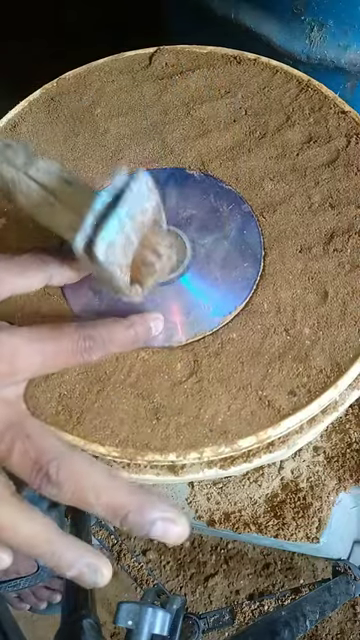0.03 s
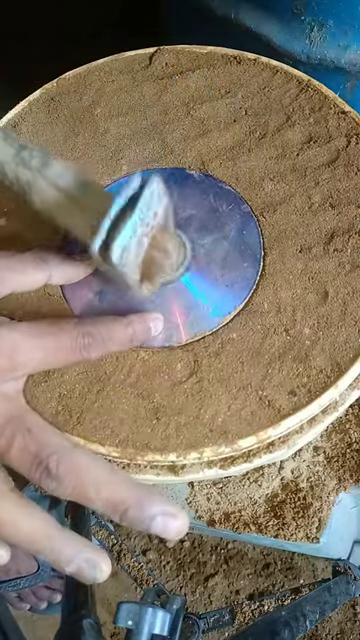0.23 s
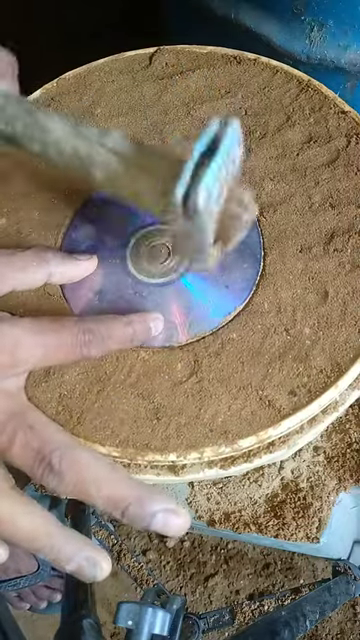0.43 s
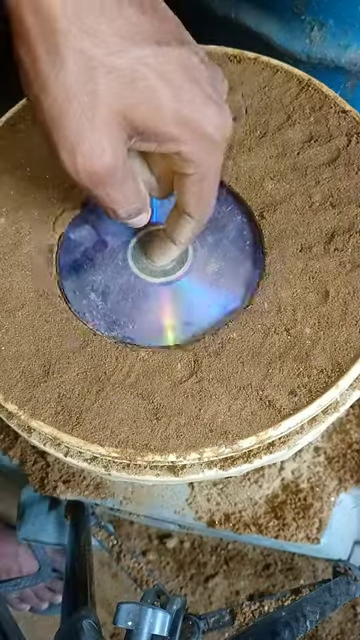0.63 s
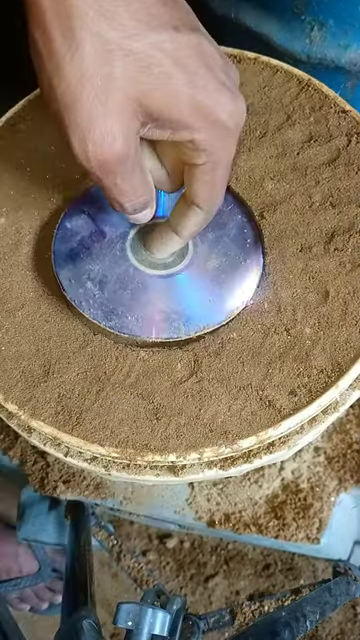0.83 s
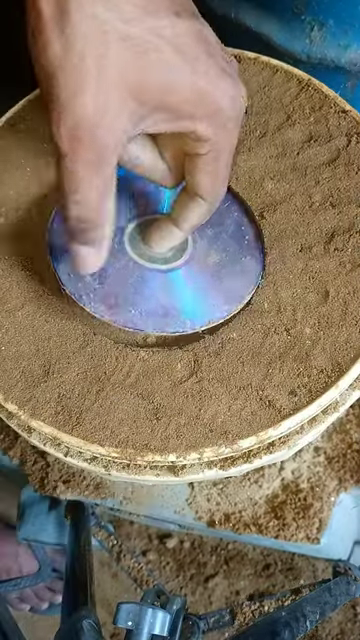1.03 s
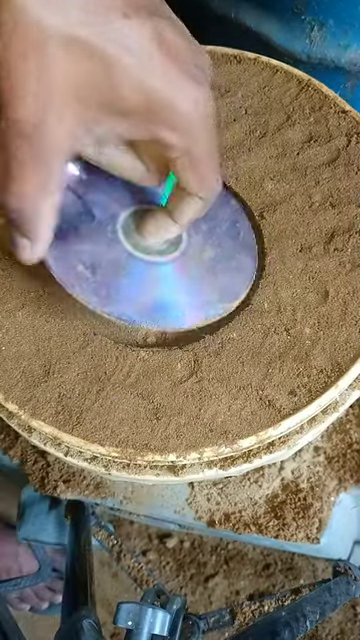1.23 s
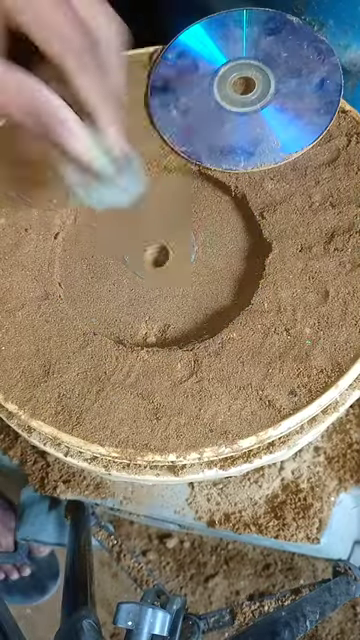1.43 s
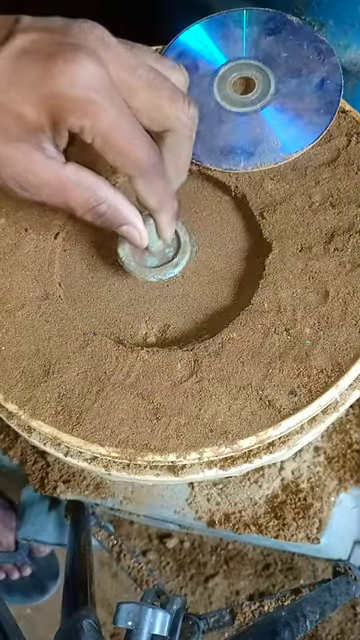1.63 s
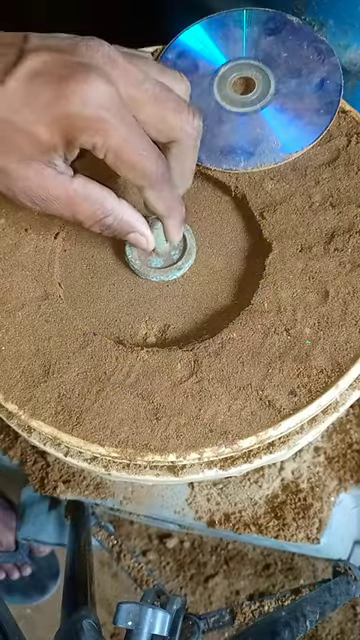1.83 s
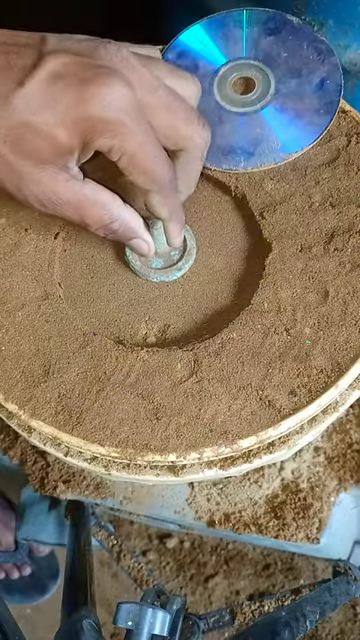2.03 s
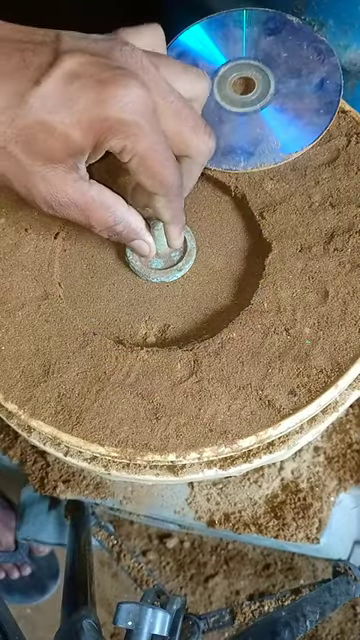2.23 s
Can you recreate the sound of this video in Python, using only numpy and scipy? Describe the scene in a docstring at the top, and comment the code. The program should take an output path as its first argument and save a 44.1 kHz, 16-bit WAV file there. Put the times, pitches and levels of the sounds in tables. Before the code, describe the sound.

Six quick, dry taps on a disc lying in sand, followed by faint finger rubs.

```python
"""Six dry taps and a small bounce: a hand tool beds a plastic disc into packed moulding sand, then is put aside.
Each tap is a click that the sand stops within 2 ms, over the thud of the moulding box and a short room tail.
Behind it the workshop hisses, a machine whines faintly and a low hum swells and fades.
Fingers press a small metal piece into the sand with soft bumps and rubs."""
import sys
import numpy as np
from scipy import signal
from scipy.fft import rfft, irfft
from scipy.io import wavfile

SR = 44100
rng = np.random.default_rng(int(sys.argv[2]) if len(sys.argv) > 2 else 0)


def log_audio(samples):
    """Write samples as a 16-bit WAV file to the path given in sys.argv[1]."""
    # one column per channel
    frames = np.atleast_2d(samples).T
    # limit to full scale, then quantise
    limited = np.clip(frames, -1, 1)
    pcm = np.round(limited * 32767).astype(np.int16)
    wavfile.write(sys.argv[1], SR, pcm)


N = 101429
TAP_SAMPLES = 16384


def amp(db):
    """dB to gain."""
    return 10 ** (np.asarray(db) / 20)


def unit_rms(x):
    """Scale to rms 1."""
    return x / np.sqrt(np.mean(x ** 2) + 1e-20)


def at_hz(table, hz):
    """Interpolate a table over log frequency."""
    table_hz, value = np.transpose(table)
    return np.interp(np.log(hz + 1), np.log(table_hz + 1), value)


def curve(table, column=1):
    """One column of a time table, per sample."""
    table = np.array(table)
    return np.interp(np.arange(N) / SR, table[:, 0], table[:, column])


def add(mix, start_s, sound):
    """Mix a sound in at start_s."""
    part = mix[max(round(start_s * SR), 0):][:len(sound)]
    part += sound[:len(part)]


def minimum_phase(db):
    """Spectrum of the quickest pulse with these levels."""
    log_gain = np.log(amp(np.r_[db, db[-2:0:-1]]))
    return np.exp(np.conj(signal.hilbert(log_gain)))[:len(db)]


def shaped_noise(spectrum):
    """Steady noise of a given spectral shape, rms 1."""
    gain = amp(at_hz(spectrum, np.fft.rfftfreq(N, 1 / SR)))
    return unit_rms(irfft(rfft(rng.standard_normal(N)) * gain, N))


def band_noise(centre_hz, width_hz):
    """Noise in one Gaussian band, rms 1."""
    gain = np.exp(-((np.fft.rfftfreq(N, 1 / SR) - centre_hz) / width_hz) ** 2)
    return unit_rms(irfft(rfft(rng.standard_normal(N)) * gain, N))


def workshop_hiss():
    """One hiss gives way to another; the level dips briefly between them."""
    # Hiss spectra: f/Hz, relative density/dB
    early_spectrum = [(20, -43), (60, -29), (105, -23.5), (135, -6), (200, -6), (260, -8.5), (400, -15),
                      (600, -17.5), (1100, -19.5), (1900, -23.5), (3800, -24), (4550, -29), (5200, -23.5),
                      (5700, -26.5), (6100, -28.5), (6500, -20.5), (6950, -24), (7350, -32), (7750, -22.5),
                      (8200, -24.5), (8500, -30.5), (8900, -27), (9500, -38), (10200, -40), (11200, -47.5),
                      (13500, -49), (15000, -46), (16000, -52.5)]
    late_spectrum = [(20, -36.5), (60, -21), (95, -7.5), (118, 2), (220, 1.5), (320, -6), (600, -9.5),
                     (1200, -12), (1600, -15), (2600, -13.5), (3600, -16), (5200, -16), (5650, -10.5),
                     (6350, -20), (6950, -13.5), (7300, -18.5), (7600, -17.5), (8100, -31), (8500, -27.5),
                     (9800, -40.5), (12000, -37), (12600, -35), (14000, -41), (16000, -44)]
    # Hiss envelopes: t/s, level/dB
    early_levels = [(0, -66), (.66, -66.5), (.75, -70.5), (.87, -66.5), (1.0, -67), (1.19, -62.5),
                    (1.35, -66), (1.48, -67.5), (1.53, -79.5), (1.65, -102.5)]
    late_levels = [(1.5, -91.5), (1.58, -75), (1.66, -69), (1.97, -69), (2.08, -67), (2.3, -68.5)]
    early = shaped_noise(early_spectrum) * amp(curve(early_levels))
    late = shaped_noise(late_spectrum) * amp(curve(late_levels))
    return early + late


def machine_whine():
    """Faint narrow-band whine of a machine."""
    # Envelope: t/s, level/dB
    levels = [(0, -83), (.9, -84.5), (1.3, -79.5), (1.46, -76.5), (1.53, -105), (2.3, -90)]
    return band_noise(centre_hz=1196, width_hz=15) * amp(curve(levels))


def hum():
    """A low tone swells, sags in pitch and fades."""
    # Pitch and envelope: t/s, f/Hz, level/dB
    track = [(0, 156, -84), (.8, 157.3, -73.5), (1.0, 159.6, -65.5), (1.11, 156.4, -57), (1.17, 155.5, -52),
             (1.25, 154.5, -52), (1.3, 151.6, -58), (1.35, 149, -75), (1.45, 148.6, -70.5),
             (1.56, 145.6, -83)]
    tone = np.sqrt(2) * np.sin(2 * np.pi * np.cumsum(curve(track)) / SR)
    return tone * amp(curve(track, column=2))


def handling():
    """Soft bumps, rubs and squeaks: each a short swell of noise in one resonance."""
    # Touches: centre t/s, sigma/s, f/Hz, width/Hz, level/dB
    touches = [(.005, 0.0042, 280, 130, -51.5), (.005, 0.011, 1500, 2540, -63.5),
               (0.87, 0.011, 200, 69.4, -65), (0.96, 0.014, 209, 70, -65.5), (1.904, 0.005, 398, 100, -65),
               (2.1, 0.025, 1900, 600, -74.5), (2.171, .02, 1170, 40.3, -73.5)]
    t = np.arange(N) / SR
    return sum(amp(db) * np.exp(-.5 * ((t - centre_s) / sigma_s) ** 2) * band_noise(hz, width_hz)
               for centre_s, sigma_s, hz, width_hz, db in touches)


def room_tail(t, onset_s=0.0018):
    """Spectrum of dense room reflections, each band dying at its own rate."""
    # Tail colour: f/Hz, level/dB
    colour = [(60, -8.5), (150, -2), (400, -0.5), (700, -1.5), (1200, -6), (2700, -7.5), (4500, -17),
              (7000, -18.5), (14000, -5.5)]
    # Tail decay: f/Hz, t60/s
    decay_times = [(150, 0.75), (400, 0.11), (1000, 0.11), (3000, 0.11), (7000, 0.17), (14000, .1)]
    reflections = rng.choice([-1., 1.], len(t)) * (rng.random(len(t)) < .2)
    hz, frame_s, bands = signal.stft(unit_rms(reflections), SR, nperseg=256)
    decay_per_s = np.log(1000) / at_hz(decay_times, hz)[:, None]
    envelope = np.exp(-decay_per_s * frame_s) * np.sqrt(2 * decay_per_s / SR)  # unit energy
    tail = signal.istft(bands * amp(at_hz(colour, hz)[:, None]) * envelope, SR)[1][:len(t)]
    return rfft(tail * np.minimum(t / onset_s, 1) ** 2)


def delay(hz, ms):
    """Spectrum of a pure delay."""
    return np.exp(-2j * np.pi * hz * ms / 1000)


def first_echoes(hz):
    """Spectrum of the reflections from hand and bench."""
    # Reflections: delay/ms, gain
    echoes = [(5.9, 0.041), (7.6, .06)]
    return sum(gain * delay(hz, ms) for ms, gain in echoes)


def box_thud(t, tilt_db_per_oct, pivot_hz=402, rise_s=.002):
    """The sand-filled box rings in damped modes."""
    # Box modes: f/Hz, level/dB, t60/s
    modes = [(159.4, -56, .28), (216.5, -48.5, 0.098), (253, -48.5, .2), (304.5, -51, 0.16),
             (403, -43.5, 0.11), (451, -52, 0.11), (483.2, -48, 0.043), (502.7, -47.5, 0.19),
             (711, -50, 0.12), (918, -53.5, 0.14), (1110, -54.5, 0.094), (1255, -51, 0.11),
             (1633, -55, 0.13)]
    ring = sum(amp(db + tilt_db_per_oct * np.log2(hz / pivot_hz)) * np.exp(-np.log(1000) * t / t60_s)
               * np.sin(2 * np.pi * (hz * t + rng.random())) for hz, db, t60_s in modes)
    return ring * (1 - np.exp(-t / rise_s))


def sand_crunch(t, relative_db=-10.5, peak_s=0.0011):
    """Spectrum of grains shifting under the disc."""
    grains = rng.standard_normal(len(t)) * t * np.exp(-t / peak_s)
    return amp(relative_db) * rfft(grains) / np.linalg.norm(grains)


def disc_click(hz, db, tilt_db_per_oct, edge_hz, edge_drop_db=-10):
    """Spectrum of the tool striking the disc; a softer contact has a lower treble edge."""
    # Base click spectrum: f/Hz, level/dB
    spectrum = [(30, -29), (90, -30.5), (160, -12.5), (300, -9.5), (500, -2.5), (680, -6.5), (1000, -0.5),
                (2000, -2), (3000, 2), (3600, 2), (4300, 5.5), (5000, 3), (5700, 1.5), (6800, -2),
                (7400, -11.5), (8100, -7), (9000, -17.5), (10000, -17), (12000, -26), (15000, -30.5),
                (16000, -41)]
    octaves = np.log2(np.maximum(hz, 300) / 2000)
    above_edge = 1 - 1 / (1 + (hz / edge_hz) ** 10)
    return minimum_phase(db + at_hz(spectrum, hz) + tilt_db_per_oct * octaves + edge_drop_db * above_edge)


def tap(click_db, tilt_db_per_oct, edge_hz, chatter_ms, chatter_gain, stop_ms, stop_gain, stop_edge_hz,
        thud_db, thud_tilt_db_per_oct, room_db):
    """The disc is kicked, chatters and is stopped by the sand; the box thuds, the room answers."""
    hz, t = np.fft.rfftfreq(TAP_SAMPLES, 1 / SR), np.arange(TAP_SAMPLES) / SR
    click = disc_click(hz, click_db, tilt_db_per_oct, edge_hz)
    chatter = chatter_gain * delay(hz, chatter_ms)
    sand_stop = stop_gain * delay(hz, stop_ms) * np.exp(-(hz / stop_edge_hz) ** 2)
    contact = 1 - chatter - sand_stop + sand_crunch(t)
    paths = 1 + first_echoes(hz) + amp(room_db) * room_tail(t)
    return irfft(click * contact * paths) + amp(thud_db) * box_thud(t, thud_tilt_db_per_oct)


def scene():
    """Taps and handling over the workshop background, mono."""
    # Six taps, two bounce contacts: t/s, click gain/dB, tilt/(dB/oct), edge/Hz, chatter/ms, chatter gain,
    # stop/ms, stop gain, stop edge/Hz, thud gain/dB, thud tilt/(dB/oct), room gain/dB
    taps = [(0.0935, -7, -1.66, 9000, .95, 0.19, 1.525, 1, 1700, 1, -1, 3),
            (.2076, -1.5, 2.5, 11000, 0.25, 0.17, 1.55, 0.96, 1010, -0.5, -3.5, 1.5),
            (0.3187, 2.5, -1, 12000, 0.19, 0.41, 1.3, 0.18, 1300, 0.5, -4, 0),
            (.4547, 0.5, -2.5, 8500, .8, .25, 1.85, 0.96, 4000, 0.5, 2.5, 1),
            (.5680, 3.5, -0.46, 8000, .4, .15, 1.497, 0.64, 5600, -2, 2.5, 1),
            (0.6745, -0.5, -0.78, 6500, 0.817, 0.59, 1.54, 0.62, 7000, -3.5, 3, 0.5),
            (0.7066, -16.5, -4, 6500, 0.63, 0.24, 2.3, 0.27, 2500, -17, 4, -3.5),
            (0.7255, -28.5, -1.5, 9000, 0.62, 0.32, 1.4, 0.53, 3990, -39, 3, -21)]
    mix = workshop_hiss() + machine_whine() + hum()
    for start_s, *blow in taps:
        add(mix, start_s, -tap(*blow))
    return (mix + handling())[None]


def record(dry):
    """Low-pass at 16 kHz."""
    lowpass = signal.firwin(255, 16000, window=("kaiser", 8), fs=SR)
    return signal.oaconvolve(dry, lowpass[None], "same")


dry = scene()
out = record(dry)
log_audio(out)
```